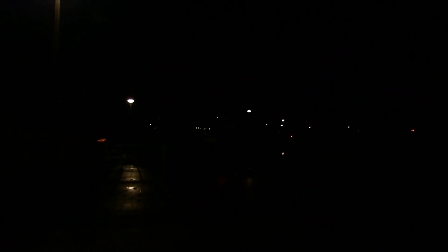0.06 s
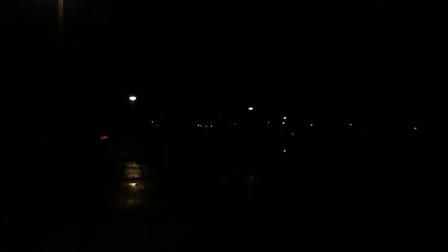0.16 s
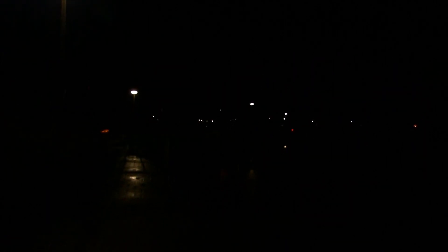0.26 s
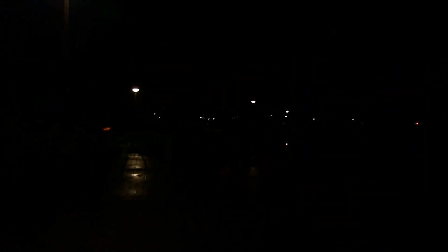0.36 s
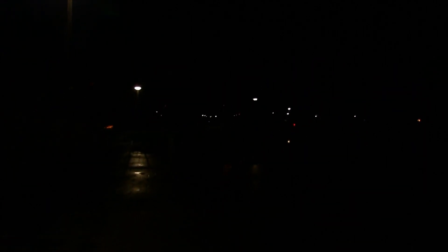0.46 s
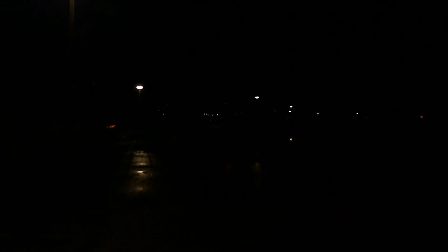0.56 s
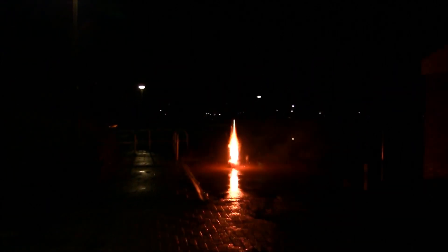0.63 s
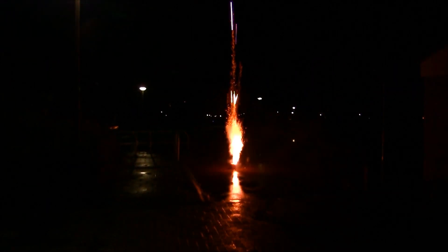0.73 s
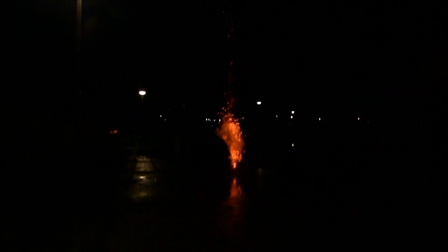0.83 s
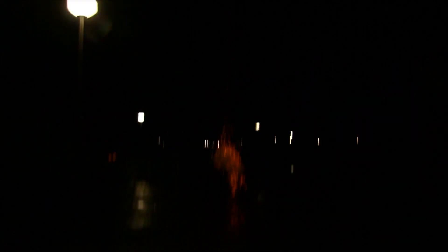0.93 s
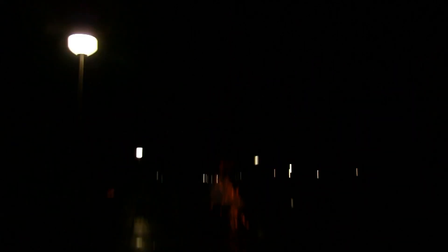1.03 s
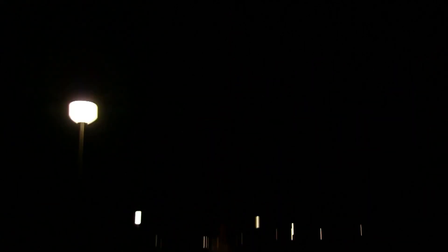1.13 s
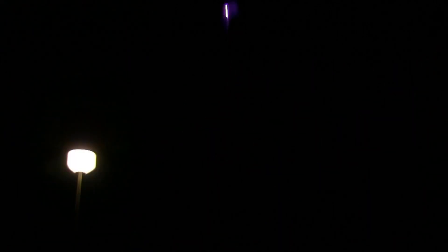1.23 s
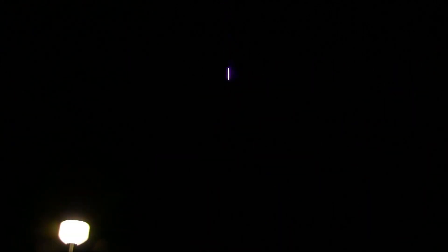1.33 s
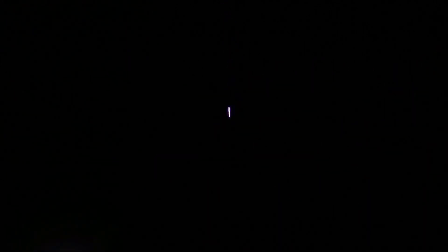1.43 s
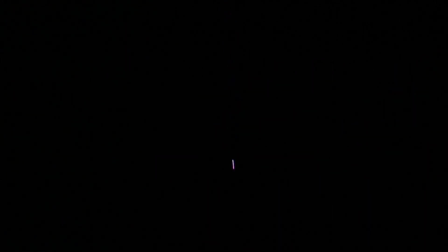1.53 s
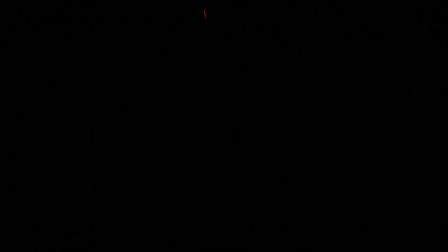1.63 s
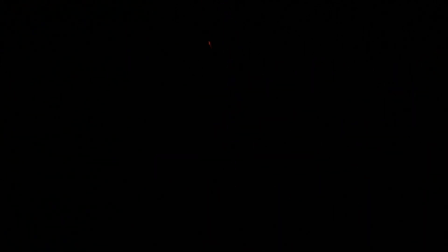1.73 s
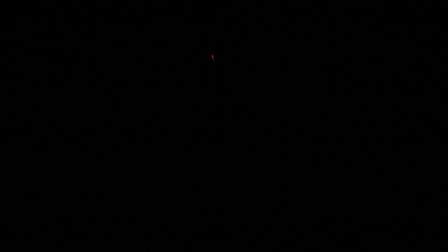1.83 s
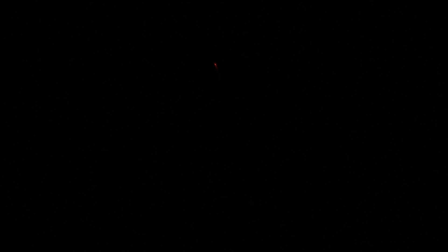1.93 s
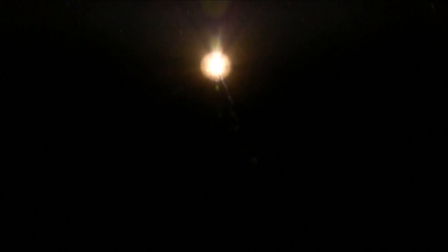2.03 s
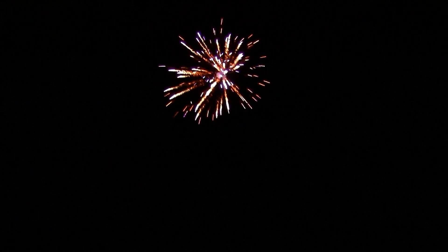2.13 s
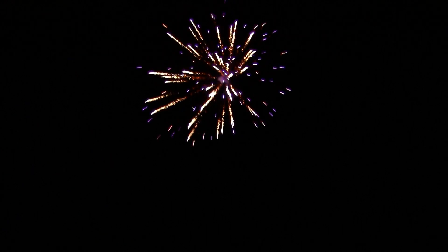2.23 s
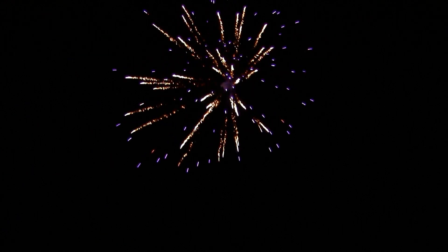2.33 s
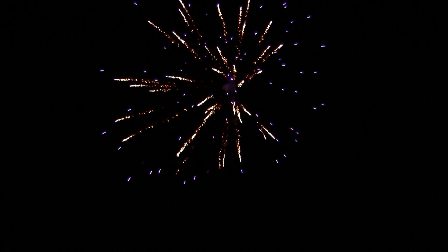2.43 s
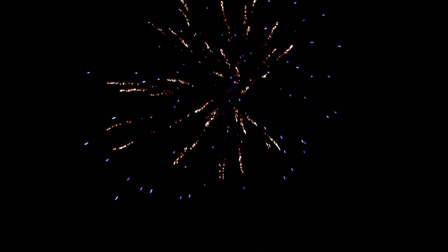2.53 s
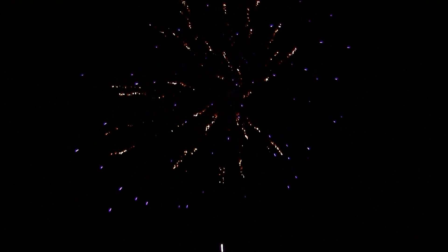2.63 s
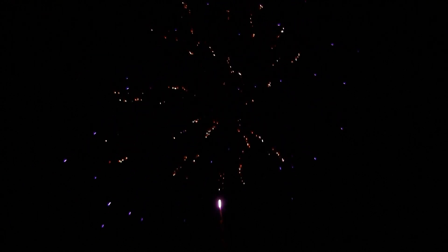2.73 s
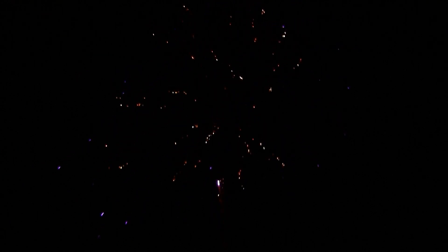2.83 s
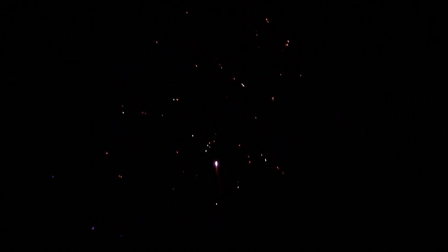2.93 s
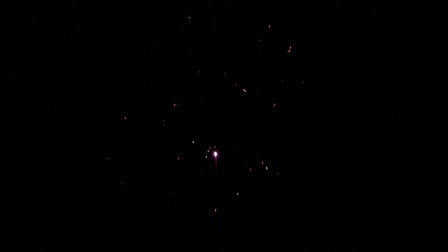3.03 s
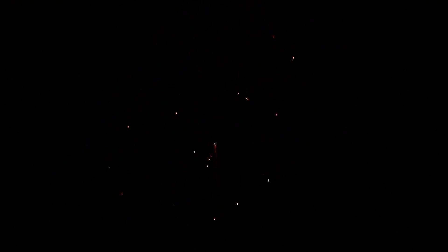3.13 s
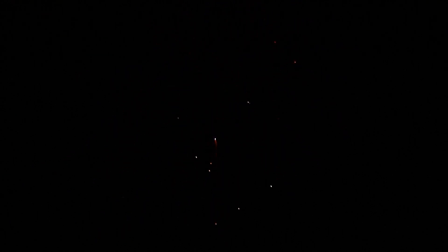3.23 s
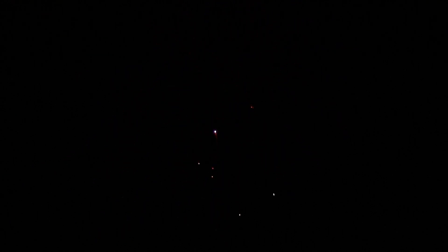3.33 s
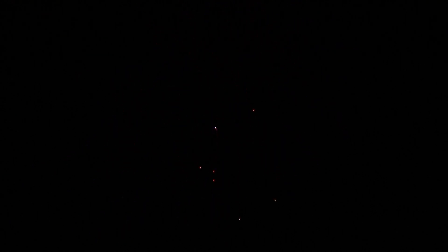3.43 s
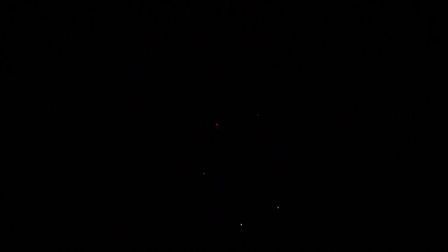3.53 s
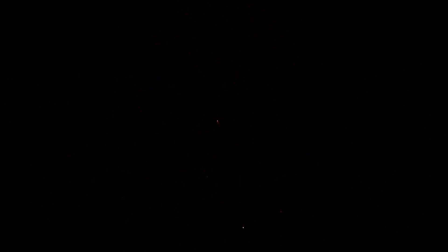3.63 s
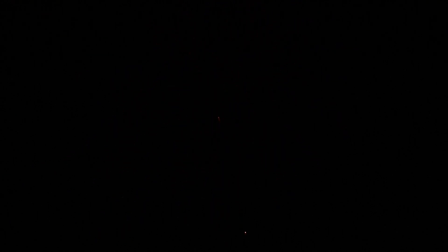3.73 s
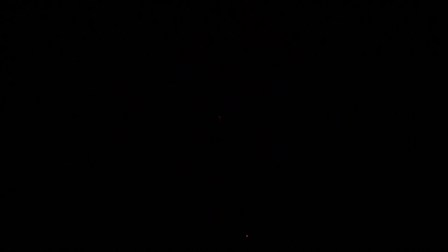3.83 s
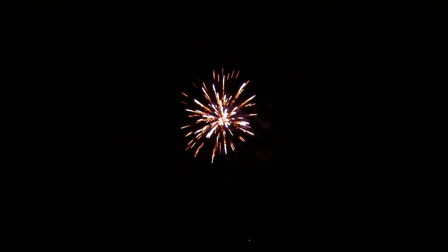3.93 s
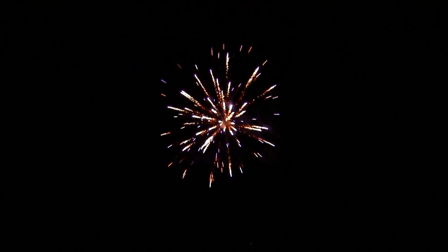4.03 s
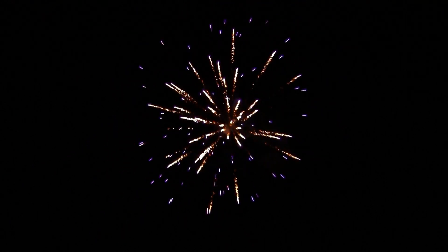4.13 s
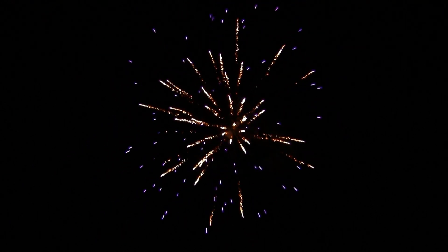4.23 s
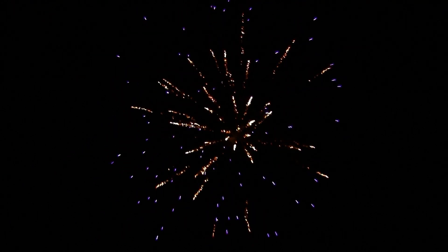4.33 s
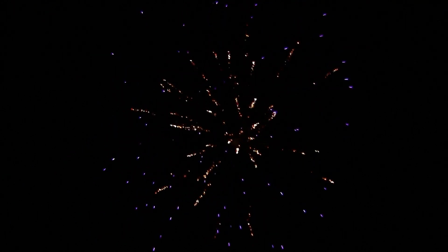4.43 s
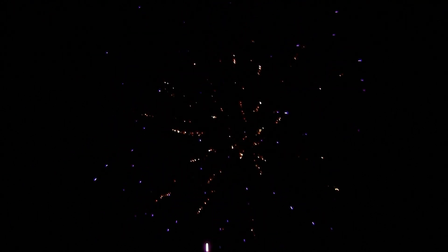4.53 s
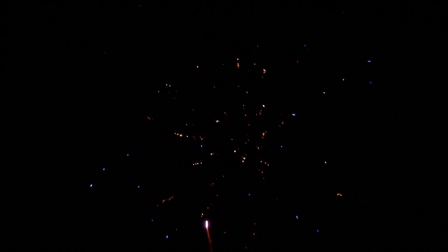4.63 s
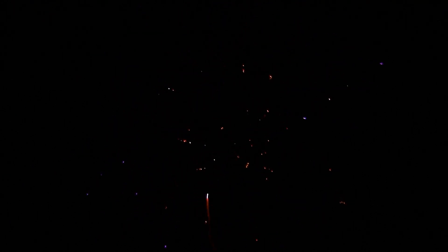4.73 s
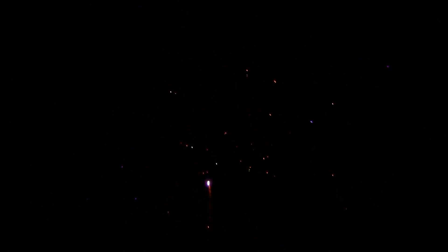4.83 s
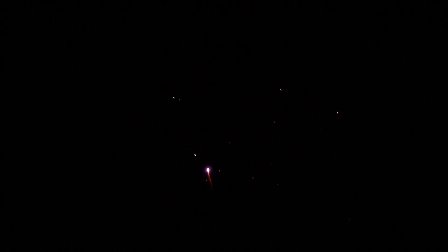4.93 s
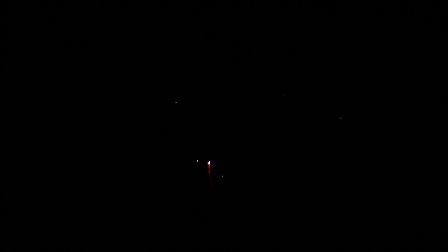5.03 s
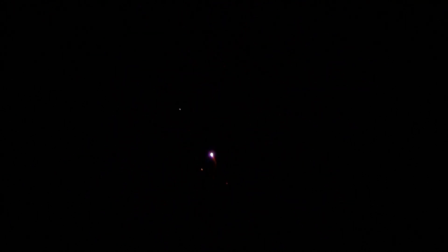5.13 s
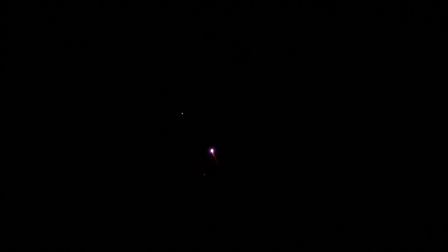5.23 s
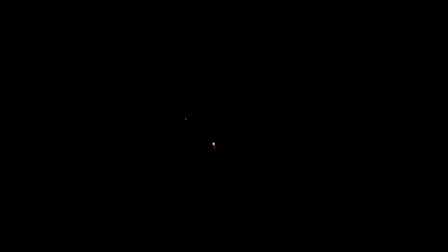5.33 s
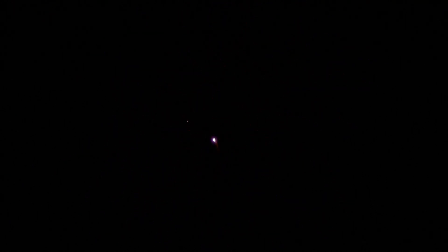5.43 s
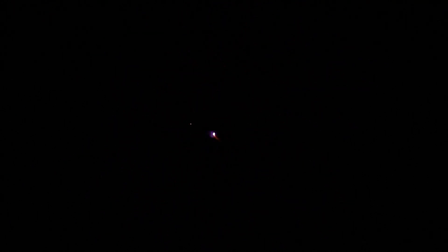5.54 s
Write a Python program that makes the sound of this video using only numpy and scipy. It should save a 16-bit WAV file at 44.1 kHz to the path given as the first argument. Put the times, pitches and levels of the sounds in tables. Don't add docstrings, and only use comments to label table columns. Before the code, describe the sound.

A firework shell thumps out of its tube, then two overloaded cracks burst overhead, each rolling away in long clattering echoes across a wet square.

```python
import sys
import numpy as np
from scipy import signal
from scipy.fft import rfft, irfft, next_fast_len
from scipy.io import wavfile
from scipy.ndimage import uniform_filter1d

SR = 44100
rng = np.random.default_rng(int(sys.argv[2]) if len(sys.argv) > 2 else 0)


def attenuation_scalar(level_db):
    decades = np.asarray(level_db, float) / 20
    return 10 ** decades


def persist_wave(psi):
    counts = np.round(np.clip(psi, -1, 1) * 32767).astype(np.int16)
    wavfile.write(sys.argv[1], SR, np.atleast_2d(counts).T)


N = 245637
T = np.arange(N) / SR
HZ = np.maximum(np.fft.rfftfreq(next_fast_len(N, real=True), 1 / SR), 1)
PAD = 2 * (len(HZ) - 1)
STEP = 16

# [f/Hz, density/dB per Hz]
WASH_COLOUR = [(29, -28), (50, -20), (114, -2.5), (461, -1), (507, -1.5), (1100, -10), (1660, -10.5),
               (2160, -14.5), (3410, -16), (4350, -24), (10900, -46.5), (14200, -58), (16000, -60)]
# [f/Hz, density/dB per Hz]
NIGHT_COLOUR = [(24, -19), (40, 3), (69, -4), (479, -16), (896, -27), (1070, -22), (3380, -37), (4930, -47),
                (13400, -55), (14800, -58), (16000, -88)]
# [f/Hz, side over mid/dB]
SIDE_SHARE = [(60, -30), (110, -33), (200, -40), (380, -24), (700, -19.5), (1290, -14), (2380, -12),
              (4400, -11), (8120, -4), (15000, -6)]
# [f/Hz, left over right/dB]
LEAN = [(60, 0.0), (110, 0.0), (200, 0.0), (380, 0.0), (700, 0.0), (1290, -0.5), (2380, -0.5), (4400, -2),
        (8120, -3.0), (15000, -1.5)]
# [t/s, side below 4 kHz level/dB, wide above f/Hz, side of the rumble level/dB]
AIM = [
    (0, -18, 4300, -2),
    (.7, -12, 2000, -2),
    (1.3, -11, 2200, 0),
    (2.2, -4, 1600, 3),
    (2.8, -5.5, 910, -11),
    (3.6, -6.5, 860, -9),
    (4.1, 3, 330, -2),
    (4.6, -0.5, 340, -10),
    (5.57, 4.5, 330, -10),
]

# [t/s, level/dB]
WIND = [(0, -29), (.15, -15), (.33, -23.5), (.45, -21), (.53, -35), (.68, -16.5), (1.18, -17), (1.4, -27),
        (1.75, -21.5), (2.1, -20.5), (2.6, -36), (3.07, -27.5), (3.35, -28.5), (3.7, -26), (4.6, -32.5),
        (5.05, -23.5), (5.3, -32.5), (5.57, -29.5)]
# [t/s, depth/dB]
CALMS = [
    (.74, 22),
    (2.23, 9),
    (4.05, 26),
]
# [t/s, peak level/dB, f/Hz]
BUFFETS = [(.135, -42, 40.4), (1.271, -18, 35.2), (3.05, -22, 45), (.9, -24, 40), (2.208, -25, 90),
           (4.045, -20, 91.5), (1.389, -23.5, 70), (1.531, -20, 91), (3.13, -27, 100), (5.025, -11.5, 36.5),
           (5.238, -24.5, 40.3), (5.377, -21, 37.5)]
# [t/s, peak level/dB, f/Hz]
TICKS = [(.177, -50, 9500), (1.2008, -40, 10500), (1.267, -25, 14000), (1.2717, -23, 13000),
         (1.2824, -49, 5180), (1.3762, -39, 9500), (1.3803, -36, 10500), (1.6364, -41, 6960),
         (1.6514, -35, 5970), (1.6764, -50, 5650), (3.8033, -43, 6040), (3.9304, -59, 5300)]

# [t/s, low level/dB, deep, middle and top above low/dB]
EARLIER_SHOTS = [
    (0.0, -51, -10, 0, -20),
]
# [t/s, low level/dB, middle above low/dB, fade/dB per s]
FAR_SHOTS = [(.09, -37, -16, 62), (.385, -49, -20, 100), (0.497, -27.5, -11, 24), (.69, -37.5, -5.5, 22.5),
             (1.36, -33.5, -2, 103), (1.62, -51, -2, 106), (1.859, -45.5, -4.5, 109), (2.11, -28, -5, 238),
             (2.157, -24.5, -14, 386), (3.62, -38.5, -7.5, 27), (3.82, -48, -11, 71), (5.32, -42, -1.5, 80),
             (5.45, -36, -9.5, 15)]
# [t/s, low level/dB, deep, middle and top above low/dB]
GROUND_SHOTS = [
    (0.72, -21, -9.5, -0.87, -22.5),
]
# [t/s, low level/dB, deep, middle and top above low/dB]
SKY_SHOTS = [
    (2.214, -20, -13, -1.7, -20),
    (4.05, -20.5, -16, -1.6, -19.5),
]
# [delay t/s, level/dB]
GROUND_ANSWER = [
    (0, 1),
    (.1, -5.5),
    (.25, -1.5),
    (.45, -8.5),
    (.6, -10),
    (.68, -16),
    (.95, -19.5),
    (1.2, -32),
    (1.5, -56),
]
# [delay t/s, level/dB]
SKY_ANSWER = [
    (0, 0.5),
    (.14, -3),
    (.3, -2),
    (.5, -2.5),
    (.63, -5),
    (.8, -8.5),
    (1.1, -13.5),
    (1.38, -19),
    (1.9, -38),
]
# [t/s, low level/dB, middle level/dB, lasts t/ms]
CLUMPS = [(.745, -2, -1.5, 41), (.78, 1.5, 0.5, 34), (.818, 5.5, 2.5, 15), (.923, 4, 2.5, 16),
          (1.011, 0.5, 4.5, 27), (1.063, 0, 1.5, 33), (1.197, 1.5, 0, 20), (1.26, 4, 3.5, 17),
          (1.291, -2, 3.5, 22), (2.3, 2, -1.5, 40), (2.369, -4, 1.5, 33), (2.425, -3, -0.5, 15),
          (2.45, 0.5, -2, 21), (2.511, 3.5, -2.5, 21), (2.567, -4, -1, 17), (2.594, -7.5, -3.5, 14),
          (2.607, 2.5, 5, 22), (2.652, 3.5, 0.5, 18), (2.68, -6.5, -3.5, 18), (2.701, 3, 2.5, 24),
          (2.727, 3.5, 2.5, 14), (2.758, 3, 0.5, 40), (2.815, -5, -1, 45), (2.9, -0.5, 0, 61),
          (2.955, 2, 1.5, 35), (3.01, 2, 0, 23), (3.05, 0.5, -0.5, 50), (3.163, 6.5, 0.5, 20),
          (3.238, 3, 2, 25), (4.13, -0.5, -3, 25), (4.156, 0, -2, 11), (4.219, 1.5, 1, 67),
          (4.319, 3, 2.5, 15), (4.369, 3, 1.5, 28), (4.42, -1.5, 1, 40), (4.474, 3.5, 2.5, 39),
          (4.535, 0, 1.5, 28), (4.587, 0.5, 1, 25), (4.64, -1.5, -1.5, 56), (4.691, -3, -2, 15),
          (4.725, 5.5, 2.5, 15), (4.75, -0.5, 1.5, 27), (4.836, 2.5, 1, 14), (4.898, 1.5, -1, 20),
          (4.98, 3, -3, 12), (3.85, -4, -2, 12)]
# [t/s, low level/dB, middle level/dB, lasts t/ms]
LATE_CLUMPS = [(1.33, -4, -1, 28), (1.42, 0, -3, 30), (1.47, 0.5, -1.5, 34), (1.53, 0, 1, 41),
               (1.6, 1, 1.5, 27), (1.7, -5, -3, 40), (1.76, -1, -3, 30), (3.1, 0, 0.5, 30),
               (3.3, 2.5, 0.5, 30), (3.36, 3, -0.5, 30), (3.43, 3, 1, 36), (3.5, 6, 0, 16),
               (3.56, -1, 0, 40), (3.655, 2, -1, 20), (3.7, 2.5, 1, 51), (3.78, 6, 1, 27),
               (3.87, 0.5, 1, 40), (3.95, -1.5, 1, 44), (4.94, 2.5, -1, 20), (5.02, 5, 1, 15),
               (5.045, 5, 0.5, 18), (5.09, 3, -1, 22), (5.13, 2, -3, 26), (5.22, -3, -1.5, 60),
               (5.42, 1, 3, 25), (5.5, -1.5, -2, 26), (.51, -3, -3, 20), (.62, -1, 2.5, 45),
               (2.135, -4, 4, 15), (2.175, 4, 7, 47)]
# [t/s, depth/dB]
DUCKS = [
    (.978, 5.5),
    (2.39, 2),
    (4.181, 5.5),
]

# [t/s, peak level/dB, f/Hz,
# width/octaves, lasts t/ms]
HOLLOWS = [(0.07, -36, 1030, 0.37, 23), (.499, -20.5, 1830, 0.44, 9.1), (.535, -22.5, 453, 0.55, 6.6),
           (.543, -32, 2280, 0.65, 10), (.553, -45, 4120, .4, 6.9), (.59, -34, 2780, 0.44, 6),
           (1.236, -22.5, 3100, 0.24, 3.6), (2.1108, -26, 3550, 0.2, 3), (2.126, -22.5, 746, 0.41, 2.5),
           (2.247, -13, 3270, 0.34, 4), (2.322, -25, 1620, 0.22, 2.2), (3.6317, -31, 2870, 0.52, 1.2),
           (3.697, -38, 1900, 0.7, 1.4), (3.743, -35, 1440, .4, 1.5), (3.83, -23.5, 335, 0.47, 3),
           (3.8605, -29.5, 1150, 0.42, 1.9), (5.317, -29.5, 2060, 0.45, 2.6), (5.325, -30, 1780, 0.59, 8.7),
           (5.388, -27.5, 1480, 0.64, 5.6), (5.406, -32, 1890, 0.47, 4), (5.203, -32, 402, .7, 2),
           (5.543, -29, 350, .7, 3), (5.34, -33, 506, 0.7, 4), (1.04, -23, 3020, 0.34, 29),
           (1.1, -26, 3100, 0.39, 17), (2.1112, -24, 1900, 0.37, 2), (4.9925, -23, 635, .6, 3.2),
           (.01, -42, 2200, 0.49, 77), (.15, -44, 2200, 0.49, 45), (1.45, -58, 8000, .9, 41),
           (1.53, -56, 8500, .9, 60), (1.86, -55, 5500, 0.65, 14), (0.991, -25, 2500, 0.85, 39),
           (1.15, -28.5, 2760, 0.56, 49), (4.092, -21, 4140, 0.12, 6), (.7355, -23, 6000, .5, 2),
           (4.406, -19, 3400, 0.27, 3), (.498, -34, 3200, 0.4, 2.3)]
# [t/s, peak level/dB, centre f/Hz, top above
# peak/dB, scatter t/ms]
BANGS = [(0.498, -8.5, 694, -58, 5.8), (0.819, -4, 380, -23, 5.4), (0.9695, -2.5, 437, -25, 3.2),
         (2.3735, -2.5, 680, -11, 4), (2.379, -9, 439, -24, 2.6), (2.384, -10, 890, -13, 1.9),
         (2.619, -7, 710, -25, 3), (2.887, -1.5, 483, -47, 4.7), (2.988, 0, 366, -53, 3),
         (3.019, -19, 367, -47, 4.3), (3.268, -11.5, 420, -45, 4.7), (3.619, -15, 358, -53, 2.9),
         (4.1672, -24, 627, -20, 4.7), (4.173, -27, 487, -25, 4.0), (4.176, -9, 980, -9, 4.6),
         (4.489, -4, 816, -43, 4.7), (4.787, -11, 374, -46, 4), (4.803, -3.5, 420, -39, 4.4),
         (4.992, -25, 638, -49, 4.0), (5.453, -10, 370, -48, 3.3), (3.036, -9.5, 132, -60, 25),
         (.726, -12, 255, -60, 5.5), (.738, -13, 230, -60, 6)]
# [t/s, peak level/dB, centre f/Hz, top above peak/dB, scatter t/ms]
SLAPS = [(0.7796, -3, 1990, -28, 4.4), (0.9338, -7, 3350, -37, 2.5), (0.9612, -3, 3020, -34, 5.5),
         (1.0594, -5, 1000, -42, 4), (1.0894, -5, 980, -40, 3.2), (2.1099, -14, 750, -58, 4.3),
         (2.1126, -18, 1500, -57, 4.3), (2.1152, -27, 2200, -52, 4.0), (2.117, -17, 1610, -47, 4.2),
         (2.1274, -18, 1660, -46, 4.0), (2.152, -12, 970, -48, 3.8), (2.606, -2, 1340, -38, 2.3),
         (4.4069, -4.5, 1520, -23, 6.1), (4.7237, -11.5, 1690, -41, 4.6), (5.456, -18, 1010, -45, 12)]
# [t/s, peak level/dB, centre f/Hz, top above peak/dB, scatter t/ms]
FAR_COLOURS = [
    (0.5, -15.5, 1730, -60, 22),
    (0.531, -20, 1800, -60, 39),
    (0.581, -23.5, 1970, -60, 48),
]
# [t/s of the push, peak level/dB, f/Hz]
ROUNDED = [(.5004, -9.5, 365), (.7187, -15, 1900), (.7218, -6, 1800), (.7224, -19, 1900),
           (2.1112, -15, 1300), (2.1125, -23, 1800), (2.1138, -11.5, 1350), (2.1163, -14, 1100),
           (2.1179, -17, 1500), (2.6165, -18, 900), (2.586, -15, 700), (2.656, -16, 600)]

# [t/s, level/dB, thin share/0-1]
LIFT = [
    (.7135, -24, 0.9),
    (.7168, -23, 0.5),
    (.7185, -9, 0.5),
    (.723, -8, 0.75),
    (.728, -12, 0.1),
    (.7385, -11, 0.2),
    (.742, -16.5, 0.15),
    (.77, -29, 0.7),
]
# [t/s, front level/dB, slowness of the swing/ratio]
BURSTS = [
    (2.2086, 0, 1.0),
    (4.0459, 0, 1.05),
]
# [delay t/s, level/dB]
BURST_ECHOES = [
    (0.0118, -6.5),
    (0.0182, -16),
    (.0215, -14),
]
# [t/s, level/dB, slowness/ratio, treble cut f/Hz]
MIRRORS = [(2.3745, -6, 1.2, 6800), (2.3797, -3, 0.7, 6400), (2.3842, -5.5, 0.86, 5000),
           (4.1674, -3, 1.2, 4500), (4.1722, -7.5, 1.05, 5000), (4.1768, -3.5, 0.73, 9700),
           (4.1018, -2.5, 1.47, 4000), (4.1058, -9, 0.78, 9000), (2.2725, -4, 1.4, 2400),
           (.7246, -5, 0.54, 5500), (.7263, -3, 1.2, 5000), (.7324, -18, .7, 8000),
           (.7365, -12, 0.99, 9000), (.7404, -19, 0.56, 5000), (.7417, -16, .8, 4000)]
# [t/s, length t/s, first f/Hz, settled f/Hz, settling t/s]
FENCE = [
    (2.25, .047, 2250, 1650, .022),
    (4.089, .063, 2250, 1500, .033),
]
# [pitch level/dB, octave level/dB, pitch peak/0-1, octave peak/0-1]
FENCE_DB = [
    (-21, -25, .2, .65),
    (-25, -25, .1, .75),
]


def rms_one(x):
    return x / np.sqrt(np.mean(x ** 2) + 1e-20)


def in_time(rows):
    s, *columns = np.transpose(rows)
    return [np.interp(T, s, c) for c in columns]


def at_hz(points, hz):
    points_hz, values = np.transpose(points)
    return np.interp(np.log(hz), np.log(points_hz), values)


def butter(x, hz, kind, order=2):
    sections = signal.butter(order, np.clip(hz, 3, .45 * SR), kind, fs=SR, output="sos")
    return signal.sosfilt(sections, x)


def band_of(spectrum, centres, own):
    return irfft(spectrum * np.interp(np.log(HZ), np.log(centres), own), PAD)[..., :N]


def drift(hz):
    coarse = butter(rng.standard_normal(N // 32 + 2002), 32 * hz, "low")[2000:]
    return np.interp(np.arange(N) / 32, np.arange(len(coarse)), rms_one(coarse))


def add(out, s, sound):
    i = round(s * SR)
    out[..., i:i + sound.shape[-1]] += sound[..., :N - i]


def coloured(x, spectrum):
    shaped = rfft(x, PAD) * attenuation_scalar(at_hz(spectrum, HZ))
    shaped[1] *= attenuation_scalar(at_hz(SIDE_SHARE, HZ))
    return shaped


def left_right(pair):
    return np.array([pair[0] + pair[1], pair[0] - pair[1]])


def dips(table, hold_s, recover_s):
    return sum(depth * (T > s) * np.clip(1 - (T - s - hold_s) / recover_s, 0, 1) for s, depth in table)


def crackle(per_s, spread_db):
    sizes = attenuation_scalar(spread_db * np.minimum(rng.exponential(1, (2, N)), 5))
    sizes = sizes * rng.choice([-1, 1], (2, N))
    return rms_one(sizes * (rng.random((2, N)) < per_s / SR))


def shock(slowness, dies_ms, first_ms=0.13, stretch=3.43):
    ms = np.arange(1, 3000) / SR * 1000
    turns = np.log(1 + ms / (first_ms * slowness)) / np.log(stretch)
    return -np.sin(np.pi * (turns + 0.55)) * np.exp(-ms / dies_ms)


def hiss():
    fuse = np.exp(-np.maximum(T - 0.12, 0) / 0.14)
    return attenuation_scalar(-78 + 12 * fuse) * rng.standard_normal((2, N))


def fizz():
    spit_db, smoulder_db = -64, -70.5
    fading = np.exp(-np.maximum(T - 0.12, 0) / 0.053)
    spit = butter(rng.standard_normal((2, N)), (4300, 8400), "band", order=4)
    spit = rms_one(spit) * [[1], [.4]]
    level_db = smoulder_db + (spit_db - smoulder_db) * fading + 1.4 * drift(14)
    return attenuation_scalar(level_db - 12 * np.clip(T - .7, 0, 1)) * left_right(spit)


def night():
    pair = irfft(coloured(rng.standard_normal((2, N)), NIGHT_COLOUR), PAD)[:, :N]
    return attenuation_scalar(-40.5 + 1.0 * drift(1.8)) * left_right(pair / np.std(pair[0]))


def wind():
    level_db, = in_time(WIND)
    swings = butter(rng.standard_normal(N + SR), [8, 18], "band")
    swings = butter(swings, 21.6, "low")[SR:]
    even = swings / np.sqrt(uniform_filter1d(swings ** 2, size=6000) + 1e-9)
    calm_db = uniform_filter1d(dips(CALMS, 0.057, 0.35), size=900)
    apart_db = np.array([[.15], [-.15]]) * drift(3.3)
    return attenuation_scalar(level_db - calm_db + 1 * drift(1.6) + apart_db) * -rms_one(even)


def rolling(s, low_db, above_db, answer, row=(0, 1, 0, 0, 0), near=False, facing=1):
    age = np.maximum(T[::STEP] - s, 0)
    delay, answer_db = np.transpose(answer)
    air_db_per_s = -4, 5.5, 20
    deep, middle, top = np.array(above_db)[:, None] - np.outer(air_db_per_s, age)
    top = top + near * 4 * np.exp(-age / 0.045)
    row_s, row_width_s, *row_db = row
    arrival = row_s + np.array([[0.028], [0], [0], [0]])
    row_db = np.array([*row_db, row_db[-1]])[:, None]
    late_db = facing * row_db * np.exp(-((age - arrival) / row_width_s) ** 2)
    follow_db = np.outer([.75, 1, 1, 1], np.interp(age, delay, answer_db))
    level_db = low_db + follow_db + late_db + np.array([deep, 0 * age, middle, top])
    rise_s = 0.029 if near else 0.0033
    return np.minimum(age / rise_s, 1) ** 0.76 * attenuation_scalar(level_db) ** 2


def clumps():
    rows = np.array(list(CLUMPS) + list(LATE_CLUMPS))
    age = T[::STEP] - rows[:, :1]
    lasts_ms = np.maximum(rows[:, 3:], 3)
    shape = (age > 0) * np.exp(-(np.maximum(age, 0) * 1000 / lasts_ms) ** 2)
    low, middle = uniform_filter1d(rows[:, 1:3].T @ shape, size=5)
    return np.array([np.interp(T, T[::STEP], db) for db in (0.99 * low, low, middle, 0.56 * middle)])


def wash_levels():
    # delay s, width s, then deep, low and middle gain dB
    sky_row, ground_row = (0.774, 0.037, 12.2, 4.7, 1.7), (0.377, 0.035, 2.2, 2.6, 3)
    power = 0
    for (s, db, *above), facing in zip(SKY_SHOTS, (1.35, 0.97)):
        power = power + rolling(s, db, above, SKY_ANSWER, sky_row, True, facing)
    for s, db, *above in GROUND_SHOTS:
        power = power + rolling(s, db, above, GROUND_ANSWER, ground_row, True)
    for s, db, *above in EARLIER_SHOTS:
        power = power + rolling(s, db, above, [(0, 0), (9, -9 * 41)])
    for s, db, middle, fade in FAR_SHOTS:
        power = power + rolling(s, db, (-22.5, middle, -69), [(0, 0), (9, -9 * fade)])
    level_db = np.array([np.interp(T, T[::STEP], 10 * np.log10(band + 1e-9)) for band in power])
    return level_db + clumps() - dips(DUCKS, 0.027, 0.042)


def wash():
    levels_db = wash_levels() - np.array([-10.5, 0, -4, -28])[:, None]
    lumps = attenuation_scalar(1.0 * drift(71) + 0.17 * drift(33))
    grains = rng.standard_normal((2, N)) + 0.42 * crackle(1500, 2.8)
    echoed = coloured(lumps * grains, WASH_COLOUR)
    echoed /= np.std(irfft(echoed[0] * (HZ > 200) * (HZ < 1000), PAD))
    centres = [95, 230, 500, 1200, 2600, 4200, 6000, 8500, 13000]
    deep_share = [0.95, 0.4, 0.044, 0.063, 0.098, 0.037, 0.0, 0.49, 0.77]
    middle_share = [0.0, 0.076, 0.0, 0.6, 1.0, 0.77, 0.67, 0.078, 0.48]
    top_share = [0.041, 0, 0.045, 0, 0.0044, 0.14, 0.67, 1.52, 2.1]
    out = 0
    for own, deep, middle, top in zip(np.eye(len(centres)), deep_share, middle_share, top_share):
        level_db = [deep, 1 - deep - middle - top, middle, top] @ levels_db
        level_db = level_db - 0.38 + 0.61 * drift(4.2) + 0.42 * drift(29)
        out = out + band_of(echoed, centres, own) * attenuation_scalar(level_db)
    return left_right(out)


def hollows():
    out = np.zeros((2, N))
    puffs = rng.standard_normal((len(HOLLOWS), 2, 5999))
    for (s, db, hz, octaves, ms), puff in zip(HOLLOWS, puffs):
        age = np.arange(5999) / (max(ms, .5) * SR / 1000)
        half = 2 ** (max(octaves, .1) / 2)
        swell = puff * np.minimum(4 * age, 1) * np.exp(-age) * [[1], [hz / 12000]]
        pair = butter(swell, [hz / half, hz * half], "band")
        add(out, s, attenuation_scalar(db) * left_right(pair / np.abs(pair).max()))
    return out


def buffets():
    out = np.zeros(N)
    for s, db, hz in BUFFETS:
        cycles = np.arange(SR // 4) / SR * hz
        add(out, s, attenuation_scalar(db) * np.sin(2 * np.pi * cycles ** 0.84) * np.exp(-cycles / 1.4))
    return out


def ticks():
    out = np.zeros((2, N))
    noise = rng.standard_normal((len(TICKS), 2, 300)) * np.exp(-np.arange(300) / (0.00079 * SR))
    for (s, db, hz), (mid, side) in zip(TICKS, noise):
        pair = butter(left_right([mid, .5 * side]), [0.53 * hz, 1.26 * hz], "band")
        add(out, s, attenuation_scalar(db) * pair / np.abs(pair).max())
    return out


def echoes(table, width):
    out = np.zeros((2, N))
    age = np.arange(2999)
    scatter = rng.standard_normal((len(table), 2, 2999))
    for (s, db, hz, top_db, scatter_ms), tail in zip(table, scatter):
        tail = tail * np.exp(-age / (max(scatter_ms, .5) * SR / 1000))
        whole = np.array([shock(700 / hz, 2200 / hz) + 0.67 * tail[0], hz / 12000 * tail[1]])
        body = butter(whole, [hz / width, hz * width * 1.32], "band")
        body = butter(body, 2360, "low", order=3)
        edge = butter(whole + [[0], [.25]] * tail, 3500, "high") * np.exp(-age / (0.0014 * SR))
        pair = body / np.abs(body).max() + attenuation_scalar(top_db + 6.0) * edge / np.abs(edge).max()
        add(out, s + 0.000782, attenuation_scalar(db - 7.0) * left_right(pair))
    return out


def rounded():
    out = np.zeros(N)
    for s, db, hz in ROUNDED:
        swing = (np.pi * hz * np.arange(-220, 220) / SR) ** 2
        add(out, s - 220 / SR, attenuation_scalar(db) * (1 - 2 * swing) * np.exp(-swing))
    return out


def lift():
    level_db, thin = in_time(LIFT)
    burning = (T > LIFT[0][0]) & (T < LIFT[-1][0])
    mid, side = signal.lfilter(shock(1.13, 0.58)[:200], 1, crackle(2600, 1.7))
    mid = (1 - thin) * rms_one(mid) + thin * rms_one(butter(mid, [1300, 3400], "band"))
    side = 0.11 * rms_one(butter(side, 2500, "high"))
    return burning * attenuation_scalar(level_db - 2.0) * left_right([mid, side])


def front(slowness):
    ground_ms = 1.73
    direct = shock(slowness, 30)[:round(ground_ms * slowness * SR / 1000)]
    direct = 0.97 * np.tanh(0.85 * direct)
    ms = np.arange(2999) / SR * 1000
    ring = .17 * np.exp(-ms / 2.2) * np.sin(2 * np.pi * ms / 1.6)
    push = -.27 * np.tanh(5 * shock(25, 22, stretch=6.5)) + ring
    return np.concatenate([direct, push])


def bursts():
    out = np.zeros(N)
    for s, db, slowness in BURSTS:
        add(out, s, attenuation_scalar(db) * front(slowness))
        for delay, echo_db in BURST_ECHOES:
            add(out, s + delay * slowness ** .2, attenuation_scalar(db + echo_db) * shock(1.6, 3.0))
    for s, db, slowness, cut_hz in MIRRORS:
        thinned = butter(front(slowness), 360, "high", order=1)
        add(out, s, attenuation_scalar(db) * butter(thinned, cut_hz, "low", order=1))
    ragged = 1 + .1 * rms_one(butter(rng.standard_normal(N), [600, 4000], "band"))
    return butter(butter(out * ragged, 5, "high", order=1), 9000, "low", order=1)


def fence():
    out = np.zeros(N)
    for (s, length, first_hz, last_hz, settle), (db, octave_db, *peaks) in zip(FENCE, FENCE_DB):
        along = np.linspace(0, 1, round(length * SR))
        slats_hz = last_hz + (first_hz - last_hz) * np.exp(-along * length / settle)
        slats_hz = slats_hz * (1 + .009 * drift(150)[:len(along)])
        phase = 2 * np.pi * np.cumsum(slats_hz) / SR
        low, high = (attenuation_scalar(3.2 * drift(90)[:len(along)])
                     * np.exp(-((along - peak) / (.25 + length * 3.5)) ** 2) for peak in peaks)
        whistle = attenuation_scalar(db) * low * np.sin(phase) + attenuation_scalar(octave_db) * high * np.sin(2 * phase)
        add(out, s, np.sin(np.pi * along) ** .3 * whistle)
    return out


def scene():
    backdrop = hiss() + fizz() + night() + wind() + buffets() + ticks()
    returns = wash() + hollows() + echoes(BANGS, width=1.64)
    returns = returns + echoes(list(SLAPS) + list(FAR_COLOURS), width=1.3) + rounded()
    return backdrop + returns + lift() + bursts() + fence()


def width(side):
    low_db, above_hz, rumble_db = in_time(AIM)
    centres = np.append(125 * 2 ** np.linspace(0, 5, 8), [6000, 9000])
    gains_db = [rumble_db + 6.7 * drift(5.9)]
    for hz in centres[1:-3]:
        narrowing_db = 11 * np.maximum(np.log2(above_hz / hz), 0)
        gains_db.append(1.5 * drift(9.0) + low_db - narrowing_db)
    gains_db += [0, 0, 0]
    spectrum = rfft(side, PAD)
    return sum(attenuation_scalar(db) * band_of(spectrum, centres, own) for own, db in zip(np.eye(len(centres)), gains_db))


def top_cut(x):
    return signal.sosfilt(signal.butter(12, 16820, fs=SR, output="sos"), x)


def record(dry):
    lean_db = at_hz(LEAN, HZ) * np.array([[.5], [-.5]])
    port_db = 2.5 / (1 + ((HZ - 3450) / 260) ** 2)
    left, right = irfft(rfft(dry, PAD) * attenuation_scalar(lean_db + port_db), PAD)[:, :N]
    side = width((left - right) / 2)
    flat = .6 * np.tanh(left_right([(left + right) / 2, side]) / .6)
    cut = signal.sosfilt(signal.cheby2(12, 60, 16800, fs=SR, output="sos"), flat)
    return top_cut(cut)


dry = scene()
out = record(dry)
persist_wave(out)
```